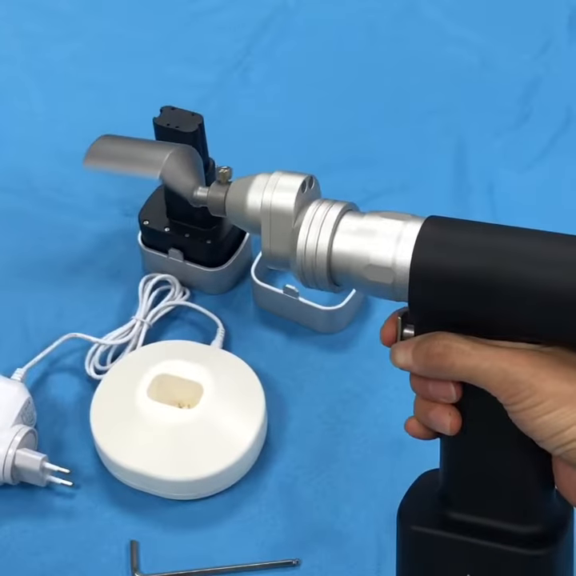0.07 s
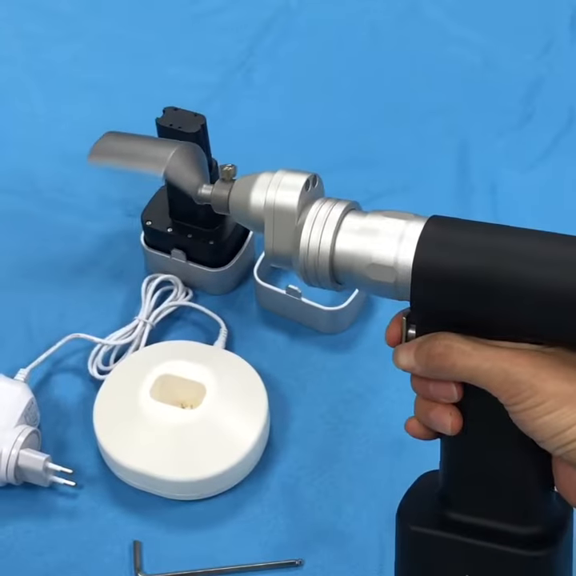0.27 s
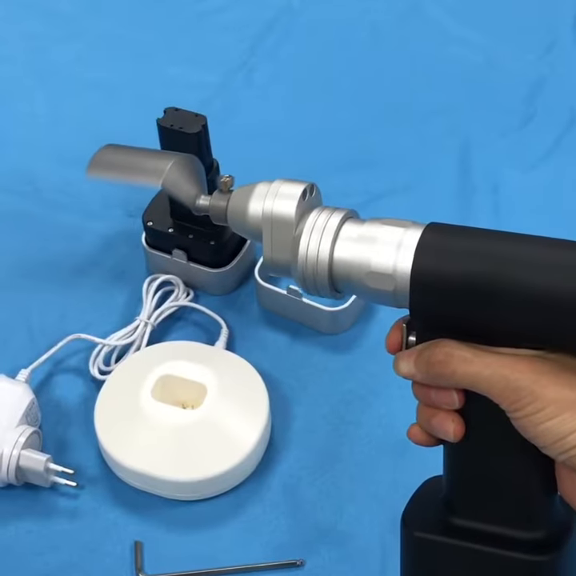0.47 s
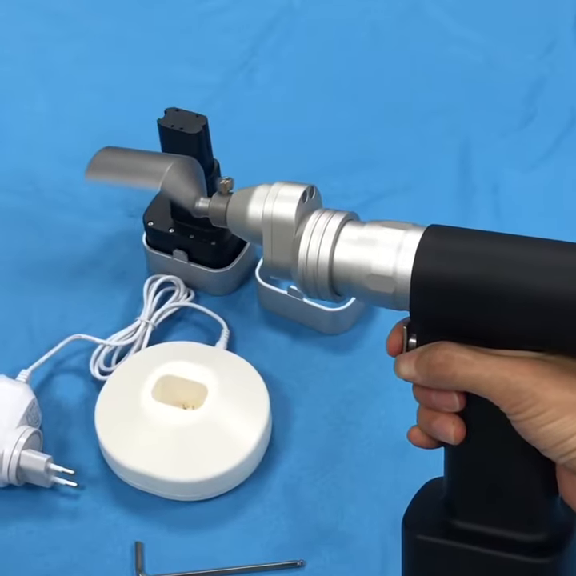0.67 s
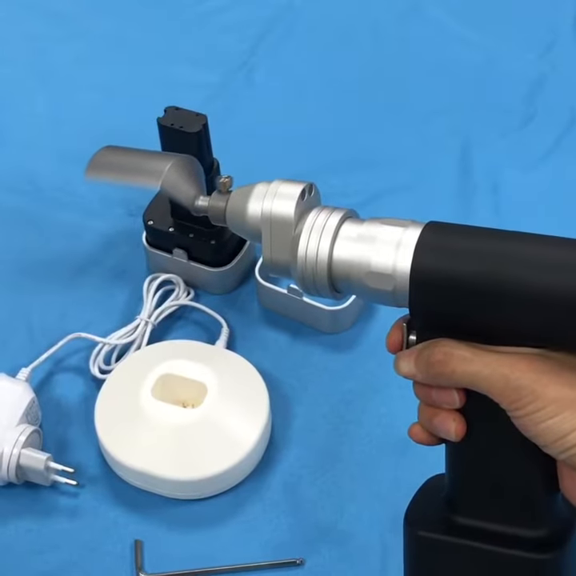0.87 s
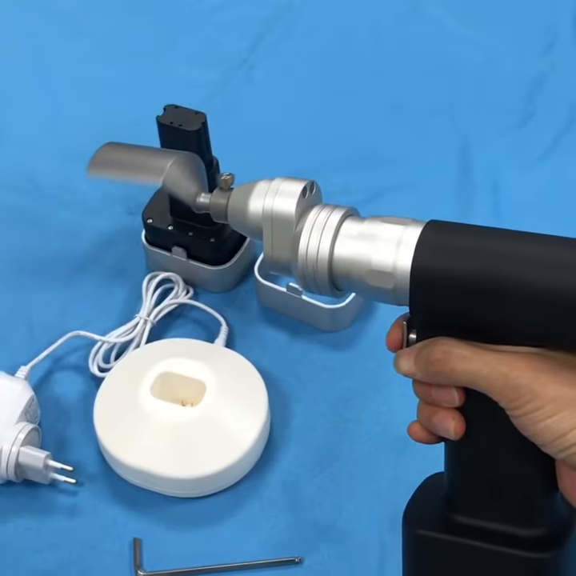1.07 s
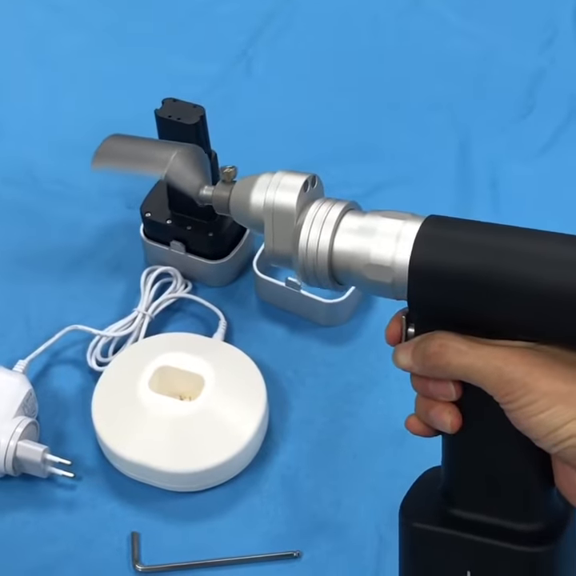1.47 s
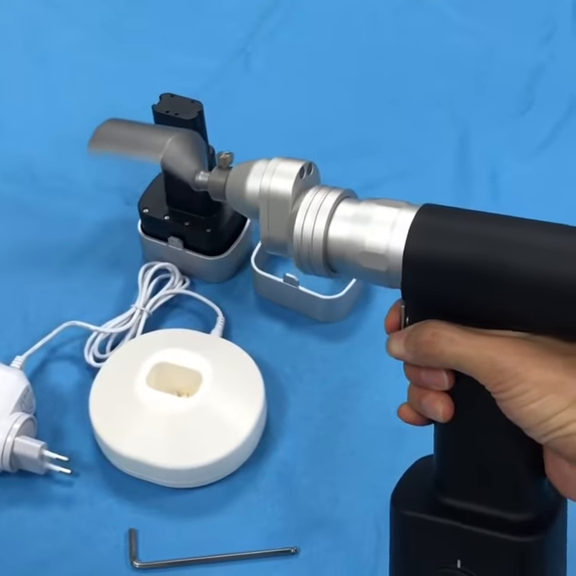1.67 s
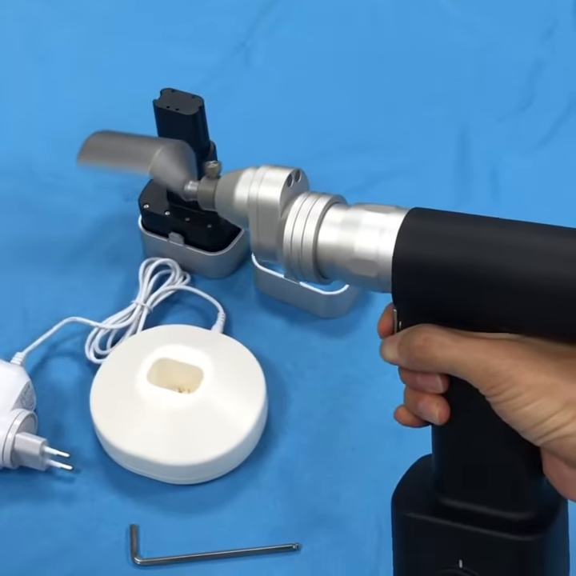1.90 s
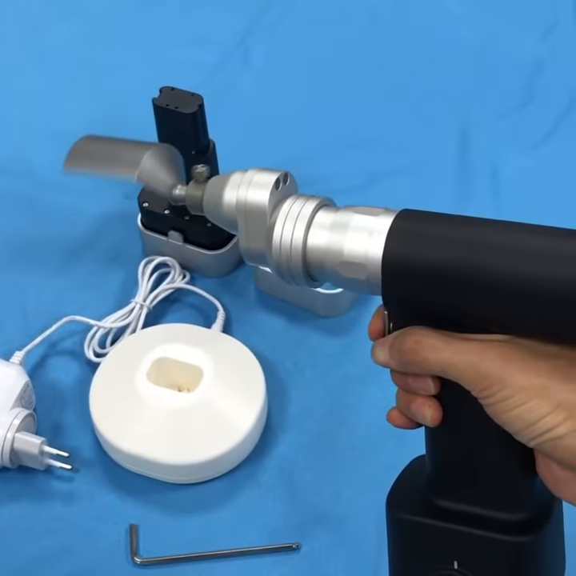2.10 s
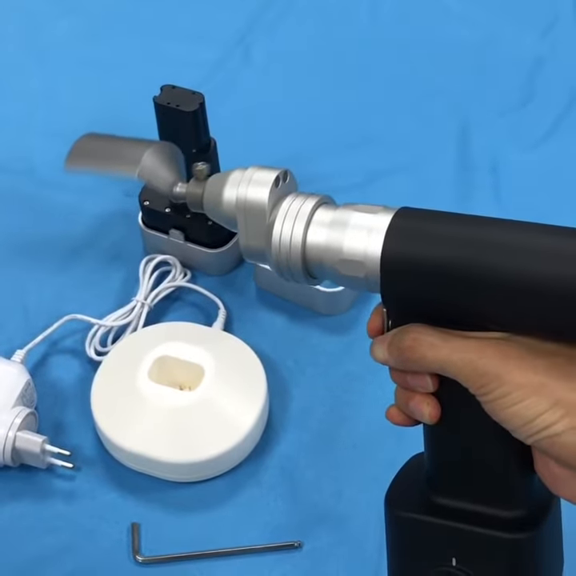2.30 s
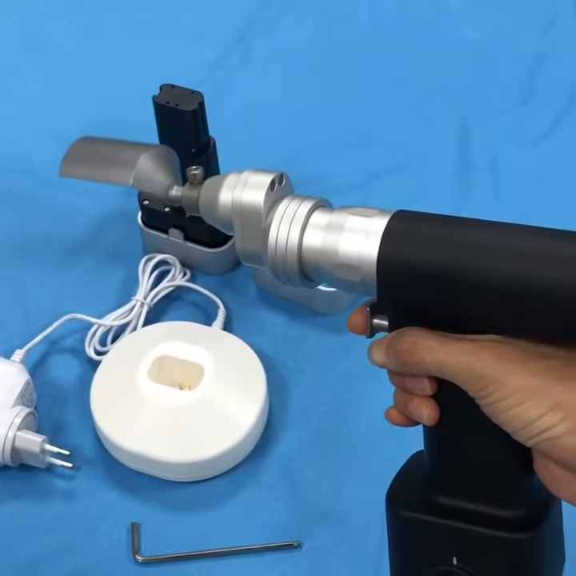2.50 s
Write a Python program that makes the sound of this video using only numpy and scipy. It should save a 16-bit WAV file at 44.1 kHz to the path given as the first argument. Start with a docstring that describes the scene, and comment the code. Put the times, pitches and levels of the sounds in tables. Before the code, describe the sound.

A handheld oscillating saw starts and runs freely with a rattling buzz. It jumps to a louder, higher whir with a thin metallic ring, then quickly winds down, heard close up in a small room.

```python
"""Oscillating saw, running free

A battery saw runs in the air, close by in a small room: half trigger, then full, then released.
Each turn of the eccentric shakes the housing and knocks through the play in the linkage; gears rasp.
The steel blade rings near 9.7 kHz and rattles through the speed changes; at full speed single
overtones sing out. Near standstill the motor whines thinly over room air and a low hum."""
import sys
import numpy as np
from scipy import signal
from scipy.fft import rfft, irfft
from scipy.io import wavfile
from scipy.ndimage import uniform_filter1d

SR = 44100
rng = np.random.default_rng(int(sys.argv[2]) if len(sys.argv) > 2 else 0)


def store_wav(level_fs):
    """Save 16-bit WAV to argv[1]."""
    pcm = np.round(np.clip(np.atleast_2d(level_fs), -1, 1) * 32767)
    wavfile.write(sys.argv[1], SR, pcm.T.astype(np.int16))


N = 116865

# The knocks within one turn. Each row: place as a share of the turn, level when slow in dB,
# level when fast in dB, low-pass cutoff in Hz, ring against click in dB.
KNOCKS = [(0.394, 2, -3.5, 9750, 6), (0.458, -4, 2, 13300, 5), (0.639, -1, 3.5, 8200, 23),
          (0.919, -10, -6.5, 11740, 51), (0.098, -2.5, 3, 3000, 12), (0.196, -36, -3.5, 8100, 31)]
JITTER_S = 2.2e-5  # timing spread of the knocks at looseness 1
TONE_WAVER_DB = 1.7


def saw():
    """The spinning eccentric shakes and knocks the whole tool; returns its tone and its clatter."""
    # Play in the linkage and rattle of the blade. Each row: time in seconds, amount from 0 to 1.
    looseness = [(0, 0.8), (.25, 0.77), (.7, 0.54), (1.42, 0.56), (1.5, 0.85), (1.64, 0.24), (1.69, 0.44),
                 (2.27, 0.4), (2.35, 0.8)]
    rattling = [(.08, .6), (.17, 1), (.25, 0.46), (.4, 0), (1.43, 0.09), (1.5, 0.75), (1.55, 0.66),
                (1.6, 0.33), (1.65, 0.4), (1.7, 0.02), (2.28, 0.28), (2.32, 0.89), (2.41, 1)]
    # Overall shaking, and the housing tone's bloom against the clatter.
    # Each row: time in seconds, level in dB.
    shaking = [(0.0, -38), (0.07, -37), (0.12, -25.5), (0.22, -22), (1.45, -22.5), (1.5, -16.5),
               (1.59, -11.5), (1.76, -15), (1.98, -14.5), (2.11, -17.5), (2.28, -17), (2.39, -24.5),
               (2.41, -29), (2.425, -35.5), (2.47, -69), (2.55, -75.5)]
    bloom = [(0, -27), (.2, -8.5), (.4, -7), (.65, -2.5), (1.26, -2.5), (1.42, -6.5), (1.5, -3),
             (1.57, -1.5), (1.64, 1.5), (1.69, -2.5), (2.0, -1.5), (2.28, 1), (2.33, -3), (2.41, -5)]
    hz = motor_speed()
    turns = np.cumsum(hz) / SR
    slow_hz, fast_hz = 118, 185  # the slow timbre crossfades into the fast one between these speeds
    fast = np.clip((hz - slow_hz) / (fast_hz - slow_hz), 0, 1)
    loose, rattle = curve(looseness), curve(rattling)
    tone = undb(curve(bloom)) * housing_tone(turns, fast, rattle) + singing_overtones(turns)
    knocks = linkage(turns, fast, loose, rattle)
    clatter = knock_colour(knocks, fast) + blade(knocks, fast, rattle) + gear_head(knocks)
    clatter += handle(knocks, loose) + (1 - fast) * clamp_tick(turns, loose)
    effort = undb(curve(shaking))
    return effort * tone, effort * clatter


def motor_speed():
    """The trigger sets the eccentric's turns per second, with a slight flutter."""
    # The five stages of the run. Each row: time in seconds, turns per second.
    spin_up = [(0, 39.4), (.06, 60), (.11, 67), (.15, 84), (.2, 96.5)]
    half_trigger = [(0.25, 98.1), (0.314, 100.1), (0.416, 102), (0.774, 103.2), (1.186, 103.2),
                    (1.392, 102.1), (1.43, 104.2)]
    squeeze = [(1.46, 112.5), (1.48, 132.6), (1.512, 162.1), (1.55, 196.2)]
    full_trigger = [(1.58, 214.6), (1.6, 214.2), (1.648, 214.8), (1.688, 208.2), (1.902, 201.6),
                    (2.018, 201.4), (2.088, 203.7), (2.28, 200.1)]
    run_down = [(2.336, 182.2), (2.365, 174.7), (2.4, 153.3), (2.5, 88.1)]
    hz = curve(spin_up + half_trigger + squeeze + full_trigger + run_down)
    return hz * (1 + 0.000935 * walk(25.505))


def housing_tone(turns, fast, rattle, settled_s=1.69, settling_s=0.042):
    """The swinging mass shakes the housing at multiples of the speed."""
    # Harmonics at low speed, at full speed and under hard acceleration.
    # Each row: multiple of the speed, relative level in dB.
    slow_orders = [(1, -22), (2, -21), (3, -20), (4, -14), (5, -18), (6, -18), (7, -4), (8, -16), (9, -4),
                   (10, 0), (11, -1), (12, -7), (13, -11), (14, -5), (15, -2), (16, -2), (17, -9), (18, -9)]
    fast_orders = [(1, -19), (2, -9), (3, -16), (4, -19), (5, -14), (6, -8), (7, -5), (8, 0), (9, -5),
                   (10, -10), (11, -11), (12, -13), (13, -12), (14, -8), (15, -6), (16, -9), (17, -16),
                   (18, -17), (19, -12), (20, -18), (21, -15), (22, -15), (23, -15), (24, -12), (25, -18),
                   (26, -14), (27, -9), (28, -12), (29, -13), (30, -10), (31, -10)]
    surge_orders = [(1, -17), (2, -19), (3, -10), (4, -19), (5, -11), (6, -11), (7, -8), (8, -20), (9, -9),
                    (10, -12), (11, -2), (12, 0), (13, -1), (14, 0), (15, -14), (16, -13)]
    # EQ at full speed. Each row: frequency in Hz, gain in dB.
    fast_eq = [(900, 1), (1250, -3.5), (1620, -1), (2100, -3.5), (2600, -0.5), (3000, -2), (4600, -1),
               (6000, -2)]
    swing = turns + .02 * rattle ** 2 * walk(250)  # the rattle wobbles the phase

    def harmonics(orders):
        return unit(sum(undb(db + TONE_WAVER_DB * walk(7.16))
                        * np.cos(2 * np.pi * k * swing + 1.52 * rng.standard_normal())
                        for k, db in orders))

    settled = undb(-1.5) * colour(harmonics(fast_orders), fast_eq)
    surge = undb(-3.5) * harmonics(surge_orders)
    slow = undb(-5.5) * harmonics(slow_orders)
    surging = np.clip((settled_s - np.arange(N) / SR) / settling_s, 0, 1)
    return crossfade(slow, crossfade(settled, surge, surging), fast)


def linkage(turns, fast, loose, rattle, scatter_db=1.5, rattle_jitter_s=.00025, rasp_s=0.00036):
    """The play knocks at set places in the turn, each time with a short ring and a burst of gear rasp."""
    knocks, energy = np.zeros(N), np.zeros(N)
    for place, slow_db, fast_db, cutoff_hz, ring_db in KNOCKS:
        at, late, hard = each_turn(turns, place)
        i = at.astype(int)
        strength = undb(slow_db + (fast_db - slow_db) * fast[i] + scatter_db * loose[i] * hard)
        jitter_s = JITTER_S * loose[i] + rattle_jitter_s * rattle[i] ** 2
        train = clicks(at + jitter_s * SR * late, strength)
        knocks += signal.lfilter(*signal.butter(2, cutoff_hz, fs=SR), strike(train, ring_db))
        energy += train ** 2
    bursts = np.sqrt(signal.lfilter([1], [1, -np.exp(-2 / rasp_s / SR)], energy))
    rasp = steady((steady(bursts) + 0.29) * rng.standard_normal(N))  # some rasp stays between knocks
    return steady(knocks) + undb(-2) * loose * rasp


def strike(train, ring_db, creep_per_s=3.5):
    """Each click rings the housing; the point of contact creeps, so the ring keeps changing colour."""
    shares = np.array([walk(creep_per_s) for _ in range(3)])
    shares /= np.linalg.norm(shares, axis=0)
    ring = sum(signal.oaconvolve(train * share, housing_ring())[:N] for share in shares)
    return (train + undb(ring_db) * ring) / np.hypot(1, undb(ring_db))


def housing_ring(decay_s=0.0044, size=900):
    """The dense, short ring of the housing, evened out over frequency, at energy 1."""
    burst = rng.standard_normal(size) * np.exp(-np.arange(size) / SR / decay_s)
    spectrum = rfft(burst, 4 * size)
    even = irfft(spectrum / uniform_filter1d(np.abs(spectrum), size=40))[:size]
    return even / np.linalg.norm(even)


def knock_colour(knocks, fast):
    """The knocks change colour as the speed rises."""
    # EQ at low and at full speed. Each row: frequency in Hz, gain in dB.
    slow_eq = [(500, -50.5), (1050, -7.5), (1350, -8), (1700, -2.5), (2200, -5), (2700, 0.5), (3300, -1.5),
               (4300, -2), (4900, -0.5), (5300, -3), (5900, -4.5), (7500, -4.5), (9100, -1.5), (9850, -13),
               (10250, -25), (10600, -9), (12300, -3), (14000, -4), (15500, -44)]
    fast_eq = [(500, -40), (1000, -12.5), (1650, -3), (2300, -6.5), (2850, 0), (3550, -7.5), (4300, -4.5),
               (4650, -2.5), (5150, -5.5), (6100, -2.5), (6800, -5.5), (9200, -4.5), (9900, -2),
               (10400, -32), (11000, -12), (12100, 1.5), (13000, -11), (14500, -0.5), (15500, -27.5)]
    return undb(-0.5) * crossfade(steady(colour(knocks, slow_eq)), steady(colour(knocks, fast_eq)), fast)


def blade(knocks, fast, rattle):
    """Knocks excite the steel blade: a high ring, lower modes at low speed, chatter as it rattles."""
    # The high ring. Each row: time in seconds, level in dB.
    ring_levels = [(.15, -17.5), (.6, -10.5), (1.0, -5.5), (1.35, -3), (1.62, -8.5), (1.76, -21),
                   (1.95, -8.5), (2.35, -6.5)]
    # Low-speed modes. Each row: frequency in Hz, width in Hz, level in dB.
    slow_modes = [(4230, 260, -15), (5230, 380, -14)]
    ring = undb(curve(ring_levels)) * resonate(knocks, hz=9696, width_hz=144)
    modes = sum(undb(db) * resonate(knocks, hz, width) for hz, width, db in slow_modes)
    chatter = undb(-9) * rattle * resonate(knocks, hz=1800, width_hz=1520)
    return ring + (1 - fast) * modes + chatter


def singing_overtones(turns, fade_s=.035):
    """Single overtones of the saw's running tone swell and fade at full speed."""
    # Each row: start in seconds, end in seconds, multiple of the speed, level in dB.
    overtones = [(1.66, 1.83, 14, -10), (1.67, 1.82, 16, -13.5), (1.68, 1.82, 21, -15),
                 (1.69, 1.82, 22, -15), (1.69, 1.82, 26, -15), (1.69, 1.81, 27, -15), (1.84, 2.03, 23, -9),
                 (1.85, 2.03, 19, -17), (1.86, 2.04, 13, -14), (2.0, 2.1, 30, -14), (2.1, 2.22, 22, -12.5),
                 (2.12, 2.21, 23, -12), (2.13, 2.28, 14, -11)]
    t, song = np.arange(N) / SR, np.zeros(N)
    for start, end, k, db in overtones:
        swell = np.clip(np.minimum(t - start, end - t) / fade_s + .5, 0, 1)
        level = np.sqrt(2) * undb(db + TONE_WAVER_DB * walk(24))
        song += level * swell * np.sin(2 * np.pi * (k * turns + rng.random()))
    return song


def gear_head(knocks, width_hz=500):
    """The gear head clatters in one broad resonance whose centre and strength move with the load."""
    # Each row: time in seconds, centre in Hz, level in dB.
    resonance = [(.14, 2430, -38), (.22, 2580, -8.5), (.36, 2557, -5.5), (.46, 2700, -9), (.54, 2560, -18),
                 (1.25, 2630, -26), (1.4, 2770, -4), (1.529, 2476, -29), (1.61, 2570, -7), (1.7, 2960, -19),
                 (1.88, 2839, -33), (2.271, 2830, -9), (2.33, 2154, -5), (2.41, 2250, -8)]
    centre_hz = curve([(s, hz) for s, hz, _ in resonance])
    level = undb(curve([(s, db) for s, _, db in resonance]))
    carrier = np.exp(2j * np.pi * np.cumsum(centre_hz) / SR)
    # A moving band-pass: shift down, low-pass, shift back up.
    band = signal.lfilter(*signal.butter(2, width_hz / 2, fs=SR), knocks / carrier) * carrier
    return level * steady(band.real)


def handle(knocks, loose):
    """A loose linkage rattles the low resonances of the handle."""
    # Each row: frequency in Hz, width in Hz, level in dB at looseness 1.
    modes = [(531, 99, -19), (651, 69, -20), (854, 133, -17.5)]
    return loose ** 2 * sum(undb(db) * resonate(knocks, hz, width) for hz, width, db in modes)


def clamp_tick(turns, loose, scatter_db=2):
    """One knock of each turn also strikes the reversing blade clamp: a crisp tick."""
    at, late, hard = each_turn(turns, place=KNOCKS[0][0])
    train = clicks(at + JITTER_S * SR * loose[at.astype(int)] * late, undb(scatter_db * hard))
    return undb(-11) * resonate(train, hz=5260, width_hz=1100)


def motor_whine(fades_by_s=.16, returns_s=2.55):
    """The motor whines thinly as it starts, and again after the run-down."""
    # Each row: frequency in Hz, level in dB.
    start_lines = [(1416, -43), (2826, -48.5), (8032, -51)]
    stop_lines = [(1502, -52), (3553, -52.5)]
    t = np.arange(N) / SR
    start, stop = (sum(undb(db) * wavering_sine(hz, depth=0.0026, rate=60.35) for hz, db in lines)
                   for lines in (start_lines, stop_lines))
    return start * np.clip((fades_by_s - t) / 0.022, 0, 1) + stop * np.clip((t - returns_s) / 0.012, 0, 1)


def grip_rumble():
    """The hand shifts on the grip in soft, low swells."""
    # Each row: peak time in seconds, half-width in seconds, level in dB.
    shifts = [(0.082, 0.17, -47.5), (0.78, 0.039, -53), (1.075, 0.091, -45)]
    # Each row: frequency in Hz, gain in dB.
    rumble_eq = [(40, 5), (110, -7), (260, 2), (450, -17), (2000, -44)]
    t = np.arange(N) / SR
    swells = sum(undb(db) * np.exp(-((t - at) / width) ** 2) for at, width, db in shifts)
    return swells * unit(colour(rng.standard_normal(N), rumble_eq))


def room(x, t60_s=0.55, treble_t60_s=0.054, split_hz=5400):
    """The small room answers with a diffuse tail whose treble dies first."""
    age = np.arange(SR // 2) / SR
    noise = rng.standard_normal(len(age)) * (age > .004)
    low = signal.lfilter(*signal.butter(1, split_hz, fs=SR), noise)
    tail = low * undb(-60 * age / t60_s) + .5 * (noise - low) * undb(-60 * age / treble_t60_s)
    return undb(-12) * signal.fftconvolve(x, unit(tail) / np.sqrt(len(tail)))[:N]


def room_tone():
    """Two low hums beat against each other under faint room air."""
    # Each row: time in seconds, level of the lower hum in dB, level of the upper hum in dB.
    hum_levels = [(0, -43.5, -61), (.9, -44.5, -54), (1.15, -44, -53), (1.42, -44, -43), (1.62, -52, -51),
                  (2.3, -55.5, -73), (2.5, -56, -62), (2.65, -49, -58)]
    # Each row: frequency in Hz, gain in dB.
    air_eq = [(25, -5), (50, 14), (90, -0.5), (200, 4.5), (600, -12.5), (2000, 0.5), (6000, -7),
              (15000, -69)]
    lower = undb(curve([(s, db) for s, db, _ in hum_levels])) * wavering_sine(48, depth=0.0225, rate=5.1)
    upper = undb(curve([(s, db) for s, _, db in hum_levels])) * wavering_sine(62, depth=0.0225, rate=5.1)
    return lower + upper + undb(-51) * unit(colour(rng.standard_normal(N), air_eq))


def undb(db):
    """Decibels to gain."""
    return 10 ** (np.asarray(db) / 20)


def unit(x):
    """Scale to rms 1."""
    return x / np.sqrt(np.mean(x ** 2) + 1e-18)


def steady(x, size=2600):
    """Scale to a running rms of 1."""
    return x / np.sqrt(np.abs(uniform_filter1d(uniform_filter1d(x ** 2, size), size)) + 1e-12)


def curve(rows):
    """Join (seconds, value) rows by straight lines."""
    return np.interp(np.arange(N) / SR, *np.array(rows, float).T)


def crossfade(a, b, share):
    """Equal-power fade from a to b."""
    return np.sqrt(1 - share) * a + np.sqrt(share) * b


def walk(rate):
    """Random drift at rms 1, taking `rate` steps a second."""
    hold = max(int(SR / rate), 2)
    steps = rng.standard_normal(2000).take(np.arange(N) // hold, mode="wrap")
    return unit(uniform_filter1d(steps, hold))


def wavering_sine(hz, depth, rate):
    """A sine at rms 1 with drifting pitch."""
    return np.sqrt(2) * np.sin(2 * np.pi * np.cumsum(hz * (1 + depth * walk(rate))) / SR)


def colour(x, points, size=4096):
    """Minimum-phase EQ through (Hz, dB) points."""
    hz, db = np.array(points, float).T
    f = np.maximum(np.fft.rfftfreq(size, 1 / SR), 1)
    cepstrum = irfft(np.log(undb(np.interp(np.log(f), np.log(hz), db))))
    cepstrum[1:size // 2] *= 2
    cepstrum[size // 2 + 1:] = 0
    return signal.fftconvolve(x, irfft(np.exp(rfft(cepstrum))))[:N]


def resonate(x, hz, width_hz):
    """One steep resonance, at a running rms of 1."""
    b, a = signal.iirpeak(hz, hz / width_hz, fs=SR)
    return steady(signal.lfilter(b, a, signal.lfilter(b, a, x)), size=5000)


def each_turn(turns, place, max_turns=600):
    """Sample positions of one hit per turn, with random draws for how late and how hard it lands."""
    late, hard = rng.standard_normal((max_turns, 2))[:int(turns[-1])].T
    return np.interp(np.arange(len(late)) + place, turns, np.arange(N)), late, hard


def clicks(at, strength, size=8):
    """Band-limited clicks at fractional sample positions."""
    out = np.zeros(N)
    index = at.astype(int)[:, None] + np.arange(1 - size, size + 1)
    offset = index - at[:, None]
    np.add.at(out, np.clip(index, 0, N - 1), strength[:, None] * np.sinc(offset) * np.sinc(offset / size))
    return out


def scene():
    """The saw in its room, in mono."""
    tone, clatter = saw()
    reverb = room(clatter + .5 * tone)
    return (tone + clatter + reverb + motor_whine() + room_tone() + grip_rumble())[None]


def record(dry, ceiling=.9, top_hz=15500):
    """Soft clipping rounds the loudest peaks and a steep low-pass cuts the top."""
    rounded = dry / (1 + (dry / ceiling) ** 6) ** (1 / 6)
    return signal.sosfilt(signal.ellip(10, .1, 80, top_hz, fs=SR, output="sos"), rounded)


dry = scene()
out = record(dry)
store_wav(out)
```